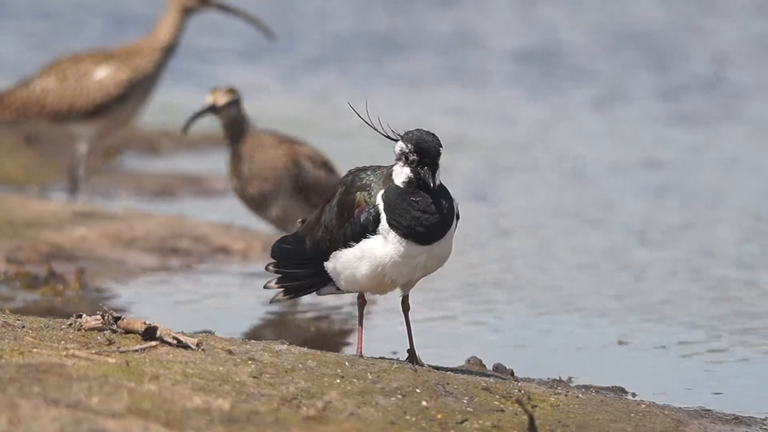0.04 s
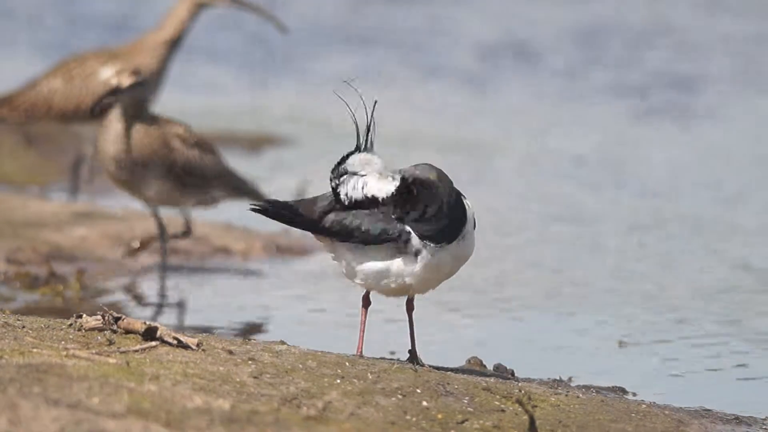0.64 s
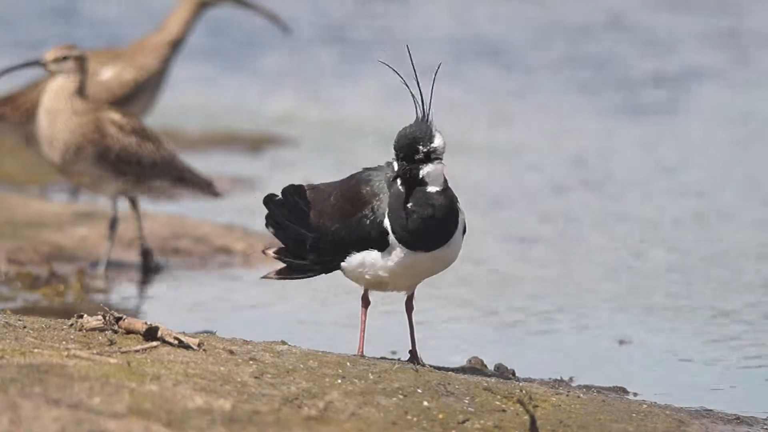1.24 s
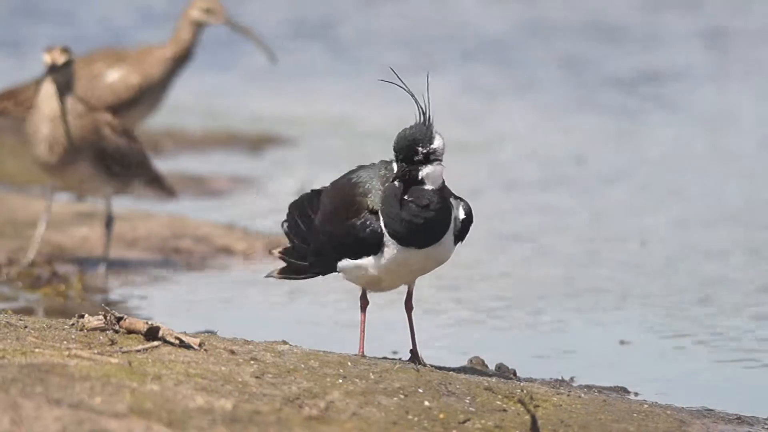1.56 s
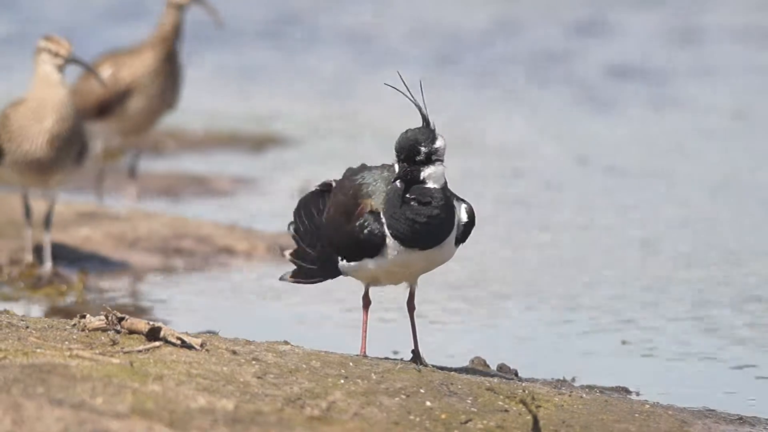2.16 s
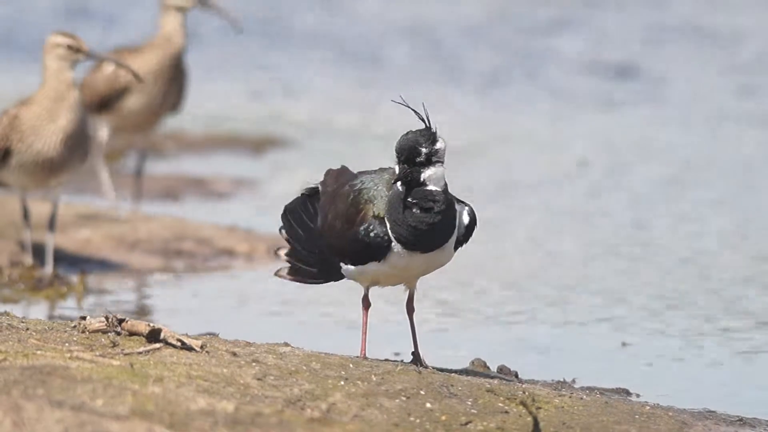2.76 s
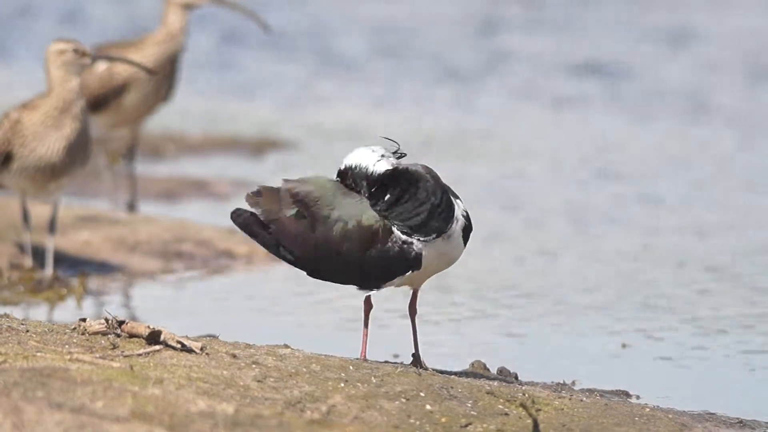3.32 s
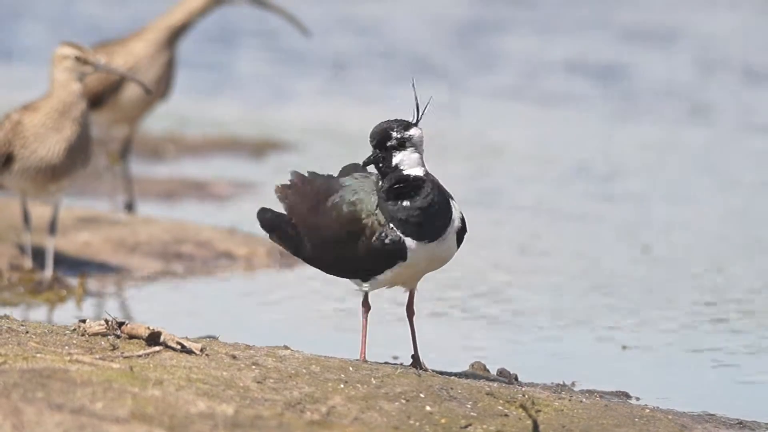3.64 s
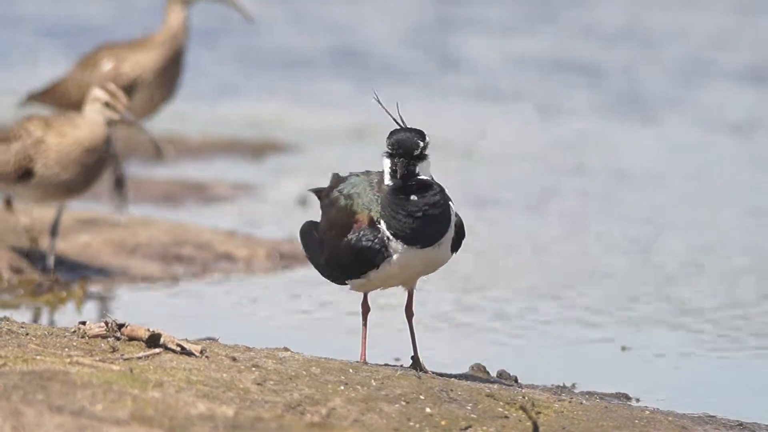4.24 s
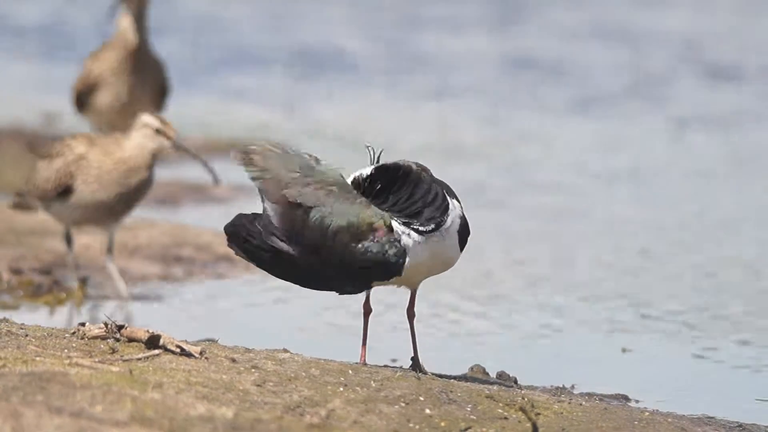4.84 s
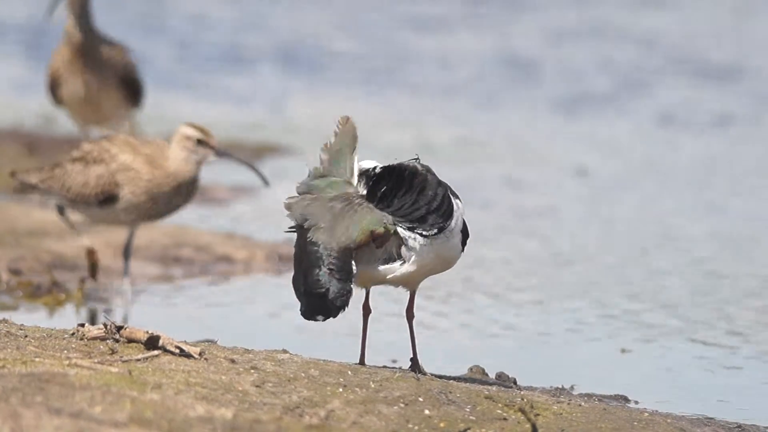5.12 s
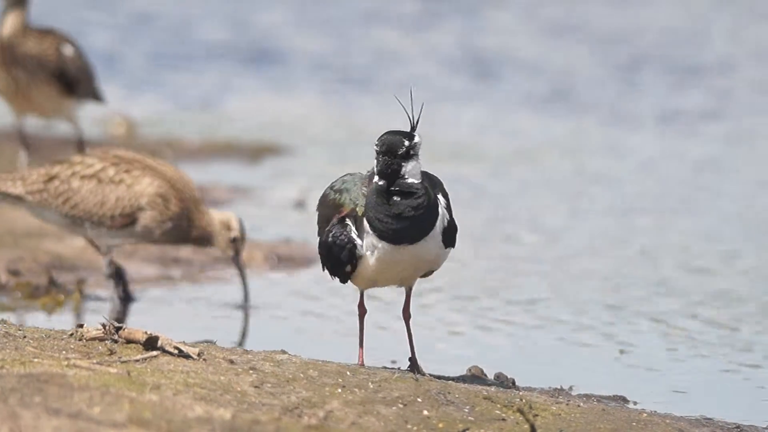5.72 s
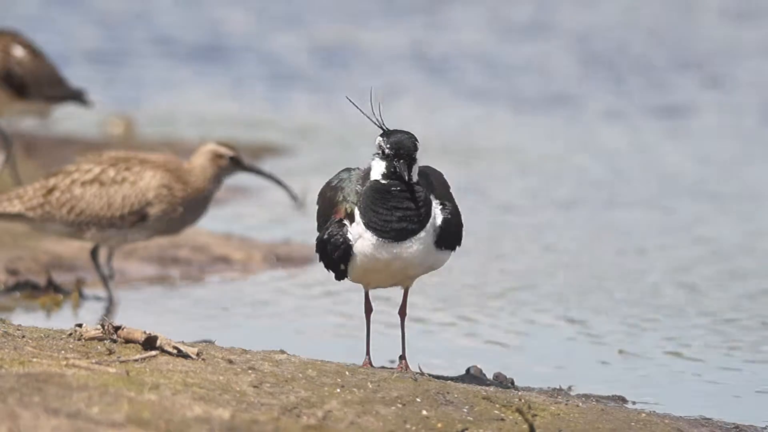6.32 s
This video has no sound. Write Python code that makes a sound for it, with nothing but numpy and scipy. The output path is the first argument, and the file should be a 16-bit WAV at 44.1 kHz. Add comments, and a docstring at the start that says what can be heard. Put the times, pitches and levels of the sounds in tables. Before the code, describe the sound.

Wading birds whistle, peep and trill over soft wind and ripples, with one brief wooden clatter near the end.

```python
"""Wading birds on a lagoon

Falling whistles, rising peeps, thin sweeps, short trills, a run of pips and distant yelps.
Each note is one nearly pure whistle on its kind's glide, thrown back by wooden walls and the far shore.
Something wooden clacks and rattles once, close by. Underneath lie the blur of a far flock, a faint
sinking tone, wind in reeds and ripples, one soft gust and a distant rumble."""
import sys
import numpy as np
from scipy import signal
from scipy.fft import rfft, irfft
from scipy.io import wavfile
from scipy.ndimage import uniform_filter1d

SR = 44100
rng = np.random.default_rng(int(sys.argv[2]) if len(sys.argv) > 2 else 0)


def inscribe(sig):
    """Save sig as 16-bit PCM at rate SR to the path in sys.argv[1].

    A 1-D sig is mono; a 2-D sig holds one channel per row.
    Samples are clipped to [-1, 1] before scaling.
    """
    pcm = np.round(np.clip(np.atleast_2d(sig).T, -1, 1) * 32767)
    wavfile.write(sys.argv[1], SR, pcm.astype(np.int16))


N = 281358

# Every _SHAPE holds the arguments of settling() or arching(), in Hz, seconds and dB.
TEW_SHAPE = dict(start_hz=2930, end_hz=2278, hold_s=.0115, settle_s=.02, length_s=.122, lead_s=.006, attack_s=.005, release_s=.026, fade_db=-6)
# Each row: start in seconds, final pitch in Hz, level in dB, pan (left minus right) in dB.
TEW_NOTES = [(.208, 2100, -41.2, -1), (.379, 2025, -40.6, -5), (.603, 2045, -40.8, -2),
             (.784, 2343, -37, -2), (.985, 2275, -37.5, 3), (1.168, 2025, -54, 0), (1.252, 2290, -37.4, 3),
             (1.388, 2025, -54, 0), (1.58, 2355, -49.5, -2), (1.768, 2343, -52, 0), (2.045, 2286, -56, 0),
             (3.572, 2410, -54, 0), (5.35, 2280, -59, 0)]
def tews(slowing=1.05):
    """Falling whistles; the lower ones are drawn out."""
    end_hz = TEW_SHAPE["end_hz"]
    notes = [(s, (end_hz / hz) ** slowing, hz / end_hz, db, pan_db) for s, hz, db, pan_db in TEW_NOTES]
    return sing("tew", settling(**TEW_SHAPE), notes)


PIP_SHAPE = dict(top_hz=2412, sag_hz=230, top_s=.036, length_s=.066, lead_s=.0175, attack_s=.006, release_s=.021, fade_db=-3)
# Each row: start in seconds, top pitch in Hz, level in dB.
PIP_NOTES = [(3.513, 2530, -46.5), (3.618, 2520, -46.3), (3.718, 2495, -46.8), (3.812, 2400, -46.5),
             (3.887, 2440, -47), (3.962, 2400, -43.5), (4.072, 2470, -43.3), (4.181, 2470, -42.2),
             (4.282, 2415, -41.3), (4.369, 2410, -43), (4.455, 2405, -42), (4.548, 2410, -39),
             (4.657, 2410, -39.2), (4.761, 2392, -37.2), (4.846, 2388, -37.2), (4.939, 2320, -44),
             (5.635, 2390, -37.5), (5.722, 2430, -41.8), (5.812, 2490, -43.2), (5.913, 2500, -41.5),
             (5.993, 2505, -40.6)]
def pips(pan_db=-1, pan_db_per_hz=.045):
    """Short arched notes of one length; higher ones come more from the left."""
    top_hz = PIP_SHAPE["top_hz"]
    notes = [(s, 1, hz / top_hz, db, pan_db + pan_db_per_hz * (hz - top_hz)) for s, hz, db in PIP_NOTES]
    return sing("pip", arching(**PIP_SHAPE), notes)


PEEP_SHAPE = dict(start_hz=3030, end_hz=3275, hold_s=.001, settle_s=.028, length_s=.08, lead_s=0, attack_s=.011, release_s=.02, fade_db=3.7)
# Each row: start in seconds, length factor, pitch factor, level in dB, pan in dB.
PEEP_NOTES = [(.085, 1, .98, -61, 0), (.312, .9, .958, -43.3, 2), (.745, 1.05, 1.0, -40.6, 4),
              (1.338, 1.12, 1.005, -38.8, 5), (1.786, .88, .993, -41.2, 3), (2.835, .6, 1.08, -63, 0),
              (3.07, .9, 1.08, -64, 0), (3.265, .7, 1.05, -63, 0)]
def peeps():
    """Short whistles that rise and level off."""
    return sing("peep", settling(**PEEP_SHAPE), PEEP_NOTES)


# Each row: time into the note in seconds, pitch in Hz, level in dB.
SLUR_CURVE = [(0, 2950, -12), (.012, 3050, -8), (.032, 3080, -12), (.045, 3165, -3), (.07, 3185, 1),
              (.085, 2900, -6), (.1, 2650, -10), (.125, 2480, -22)]
# Each row: start in seconds, length factor, pitch factor, level in dB, pan in dB.
SLUR_NOTES = [(2.196, 1, 1, -33, 4)]
def slur():
    """One loud whistle that climbs a little, then drops."""
    return sing("slur", SLUR_CURVE, SLUR_NOTES)


# Each row: time into the stroke in seconds, pitch in Hz, level in dB.
FLICK_CURVE = [(0, 3200, -20), (.012, 3550, -11), (.02, 3900, -30), (.027, 4450, -13), (.035, 4750, -12),
               (.039, 5750, -15), (.046, 6050, -11), (.06, 6350, -24)]
SWEEP_CURVE = [(0, 6400, -40), (.014, 6180, -7), (.028, 5980, 0), (.054, 5600, -2), (.07, 4900, -6),
               (.084, 4480, .5), (.104, 4230, -15)]
# Each row: start in seconds, level in dB.
SWEEP_CALLS = [(.305, -47), (1.307, -46.5), (2.183, -46.5), (3.288, -48), (3.884, -52), (5.113, -47.2),
               (5.745, -49.5)]
def sweeps(down_after_s=.093, pan_db=-5.5):
    """Thin calls: a quick flick up, then a longer sweep down."""
    ups = [(s, 1, 1, db, pan_db) for s, db in SWEEP_CALLS]
    downs = [(s + down_after_s, 1, 1, db, pan_db) for s, db in SWEEP_CALLS]
    return sing("flick", FLICK_CURVE, ups) + sing("sweep", SWEEP_CURVE, downs)


TRILL_SHAPE = dict(top_hz=3640, sag_hz=400, top_s=.018, length_s=.045, lead_s=0, attack_s=.006, release_s=.007, fade_db=0)
# Each row: start in seconds, syllable count, level in dB.
TRILL_CALLS = [(-.2, 4, -49.5), (.733, 4, -47.8), (1.841, 4, -45.7), (2.172, 1, -47), (3.442, 4, -46.3)]
# Each row: time into the trill in seconds, pitch factor, accent in dB.
TRILL_RHYTHM = [(0, 1.06, -2.5), (.063, 1.005, -.3), (.121, 1.0, 1), (.193, .99, -.3)]
def trills(pan_db=-2.2):
    """Raspy syllables on one rhythm; the first trill is already ending as the scene opens."""
    notes = [(s + after_s, 1, pitch, db + accent_db, pan_db)
             for s, count, db in TRILL_CALLS
             for after_s, pitch, accent_db in TRILL_RHYTHM[:count]
             if s + after_s > -TRILL_SHAPE["length_s"]]
    return sing("trill", arching(**TRILL_SHAPE), notes)


# Each row: time into the note in seconds, pitch in Hz, level in dB.
HOOK_CURVE = [(0, 4250, -16), (.015, 4780, -6.5), (.032, 4900, -5.5), (.045, 4500, -14), (.053, 3450, -3),
              (.062, 3130, -1), (.08, 3050, -5), (.095, 3020, -14)]
DIP_CURVE = [(0, 5450, -8), (.012, 5200, -2), (.033, 4500, 0), (.055, 4600, -8), (.08, 5000, -5),
             (.115, 4950, -16)]
BUZZ_CURVE = [(0, 7000, -20), (.04, 6450, -9), (.065, 5850, 0), (.095, 5250, -5), (.125, 4500, -1),
              (.145, 3900, -8), (.17, 3820, -14)]
# Each row: start in seconds, length factor, pitch factor, level in dB, pan in dB.
HOOK_NOTES = [(4.298, .9, 1, -51.5, -2), (4.48, .8, .95, -52, -2), (4.96, 1.1, .99, -49, -2),
              (5.765, 1.1, 1.04, -49, -2)]
DIP_NOTES = [(2.878, 1, 1, -52, -3)]
BUZZ_NOTES = [(4.395, 1, 1, -49, -6)]
def squeaks():
    """High, raspy calls: hooks that rise and plunge, one dip and one falling buzz."""
    return (sing("hook", HOOK_CURVE, HOOK_NOTES) + sing("dip", DIP_CURVE, DIP_NOTES)
            + sing("buzz", BUZZ_CURVE, BUZZ_NOTES))


# Each row: time into the note in seconds, pitch in Hz, level in dB.
HELD_CURVE = [(0, 2780, -10), (.025, 2580, 3), (.06, 2440, -4), (.085, 2415, -8), (.11, 2410, -4),
              (.26, 2410, -6)]
# Each row: start in seconds, length factor, pitch factor, level in dB, pan in dB.
HELD_NOTES = [(6.13, 1, 1, -51.5, 7)]
def held_note():
    """A closing whistle that falls, then holds its pitch."""
    return sing("held", HELD_CURVE, HELD_NOTES)


RISE_SHAPE = dict(start_hz=4620, end_hz=5680, hold_s=.006, settle_s=.088, length_s=.102, lead_s=.002, attack_s=.007, release_s=.022, fade_db=6)
# Each row: start in seconds, note count, period in seconds, first pitch factor, peak level in dB.
RISING_RUNS = [(.6, 9, .137, 1.135, -57.3), (5.262, 5, .153, 1.06, -58.5)]
def rises(last_pitch=.975, sink_notes=1.8, loudest_share=.42, tiring=15, pan_db=-3):
    """Even runs of rising notes; each run starts high, sinks in pitch, swells and tires."""
    notes = []
    for start_s, count, period_s, first_pitch, peak_db in RISING_RUNS:
        for k in range(count):
            pitch = last_pitch + (first_pitch - last_pitch) * np.exp(-k / sink_notes)
            db = peak_db - tiring * (k / (count - 1) - loudest_share) ** 2
            notes.append((start_s + k * period_s, 1, pitch, db, pan_db))
    return sing("rise", settling(**RISE_SHAPE), notes)


YELP_SHAPE = dict(top_hz=1890, sag_hz=250, top_s=.062, length_s=.135, lead_s=0, attack_s=.025, release_s=.035, fade_db=-1)
# Each row: start in seconds, length factor, pitch factor, level in dB, pan in dB.
CLEAR_YELPS = [(1.32, 1.1, .94, -55, 0), (2.59, .5, 1.22, -56, 0), (2.66, .6, 1.19, -52.5, 0),
               (2.78, .4, .97, -54, 0), (3.09, .5, 1.2, -55.5, 0), (3.145, .6, 1.16, -55, 0),
               (3.19, .7, .98, -54.5, 0), (3.245, .9, 1.14, -54.5, 0), (3.96, 1, 1.01, -53, 0),
               (4.08, .45, .95, -55, 0)]
# Each row: start and end in seconds, pitch in Hz, level in dB.
FAINT_BOUTS = [(2.2, 2.42, 1830, -58), (2.63, 2.86, 1770, -58), (3.44, 3.56, 1800, -59),
               (3.75, 4.15, 1750, -62), (4.67, 5.3, 1780, -60.3), (5.08, 5.25, 2200, -58)]
def yelps(per_s=10, scatter_octaves=.11, scatter_db=1.5):
    """Distant birds yelp in loose bouts around a few clearer calls."""
    def notes():
        yield from CLEAR_YELPS
        for start_s, end_s, hz, db in FAINT_BOUTS:
            for s in np.arange(start_s, end_s, 1 / per_s):
                late, long, high, loud = rng.uniform(-1, 1, 4)
                stretch = .7 * 2 ** (.5 * long)
                pitch = hz / YELP_SHAPE["top_hz"] * 2 ** (scatter_octaves * high)
                yield s + .5 * late / per_s, stretch, pitch, db + scatter_db * loud, 0
    return sing("yelp", arching(**YELP_SHAPE), notes())


PIPE_SHAPE = dict(start_hz=1435, end_hz=1372, hold_s=.01, settle_s=.35, length_s=.62, lead_s=0, attack_s=.04, release_s=.14, fade_db=-1)
# Each row: start in seconds, length factor, pitch factor, level in dB, pan in dB.
PIPE_NOTES = [(0, .5, 1.01, -68, 0), (.97, .9, 1.06, -62, 0), (2.78, 1, 1, -64, 0),
              (3.82, .4, .955, -66, 0), (5.96, .7, .99, -67, 0)]
def pipes():
    """Faint, long, low whistles that sag slightly."""
    return sing("pipe", settling(**PIPE_SHAPE), PIPE_NOTES)


def envelope(length_s, lead_s, attack_s, release_s, fade_db, edge_db=-16):
    """Times and dB levels of a note: soft lead-in, attack, sloping hold, release."""
    t = np.linspace(0, length_s, 80)
    onset = np.clip(1 - (t - lead_s) / attack_s, 0, 1)
    ending = np.maximum(1 - (length_s - t) / release_s, 0)
    return t, edge_db * (onset + ending) + fade_db * t / length_s


def settling(start_hz, end_hz, hold_s, settle_s, **shape):
    """A glide that holds its first pitch, then slides ever more slowly towards its last."""
    t, db = envelope(**shape)
    hz = end_hz + (start_hz - end_hz) * np.exp(-np.maximum(t - hold_s, 0) / settle_s)
    return np.transpose([t, hz, db])


def arching(top_hz, sag_hz, top_s, **shape):
    """A glide that starts sag_hz low, peaks at top_s and falls again."""
    t, db = envelope(**shape)
    return np.transpose([t, top_hz - sag_hz * (t / top_s - 1) ** 2, db])


def whistle(glide, stretch, pitch, level_db, pan_db, rough, rasp, octave_db,
            flutter_db=1.3, lag_s_per_db=8e-6, break_hz_per_s=60000):
    """One unsteady, slightly raspy tone with a weak octave, louder and earlier on the bird's side."""
    s, hz, db = np.transpose(glide)
    t = np.arange(0, s[-1] * stretch, 1 / SR)
    hz = uniform_filter1d(np.interp(t / stretch, s, hz), size=200, mode="nearest") * pitch
    rasp = rasp * (1 + abs(np.gradient(hz, t)) / break_hz_per_s)  # the voice breaks up on pitch leaps
    noise = (wander(len(t), rate_hz=330) + 1j * wander(len(t), rate_hz=330)) / np.sqrt(2)
    grit = (1 + rasp * noise) / np.hypot(1, rasp)
    hz = hz * (1 + rough * wander(len(t), rate_hz=260))
    level = gain_of(level_db + np.interp(t / stretch, s, db) + flutter_db * wander(len(t), rate_hz=120))
    fade = np.clip(np.minimum(t, t[-1] - t) / .003, 0, 1)
    side_db = np.array([[.5], [-.5]]) * pan_db
    phasor = np.exp(2j * np.pi * (np.cumsum(hz) / SR + hz * side_db * lag_s_per_db))
    tone = (grit * (phasor + gain_of(octave_db) * phasor ** 2)).real
    return np.sqrt(2) * level * fade * gain_of(side_db) * tone


# Each row, by voice: pitch roughness and rasp as shares, then octave, wall echo and shore echo in dB.
TIMBRES = dict(tew=(.006, .2, -42, -1, -13), peep=(.003, .07, -32, -11, -16),
           slur=(.002, .04, -29, -8, -15), flick=(.025, .4, -50, -2, -22), sweep=(.006, .16, -50, -5, -22),
           rise=(.009, .16, -50, -3, -18), trill=(.022, .5, -36, -1, -19), pip=(.007, .2, -33, -8, -11.5),
           hook=(.014, .5, -30, 0, -15), dip=(.008, .25, -50, -2, -17), buzz=(.025, .45, -50, -1, -18),
           yelp=(.014, .25, -19, -2, -6), pipe=(.003, .12, -30, -8, -10), held=(.005, .2, -35, -8, -12))
def sing(name, glide, notes):
    """One voice's whistles, split three ways: direct, towards the walls, towards the shore."""
    rough, rasp, octave_db, wall_db, shore_db = TIMBRES[name]
    voice = np.zeros((2, N))
    for s, stretch, pitch, level_db, pan_db in notes:
        add(voice, s, whistle(glide, stretch, pitch, level_db, pan_db, rough, rasp, octave_db))
    voice /= np.hypot(1, gain_of(wall_db))  # direct and wall paths share the energy
    return np.array([voice, gain_of(wall_db) * voice, gain_of(shore_db) * voice])


def birds(gain_db=.7):
    """All the voices, with quick echoes from the walls and a faint tail from the shore."""
    direct, walls, shore = (tews() + peeps() + slur() + sweeps() + rises() + trills() + pips()
                            + squeaks() + pipes() + held_note() + yelps())
    return gain_of(gain_db) * (direct + slaps(walls) + echo(shore, delay_s=.04, t60_s=1.0))


# Each row: delay in seconds, level in dB.
WALL_SLAPS = [(.007, -6), (.013, -4), (.021, -6), (.033, -10)]
def slaps(x, spread_s=.001, scatter_db=-5):
    """Strong reflections off flat boards beat against each glide; weaker scatter follows."""
    out = gain_of(scatter_db) * echo(x, delay_s=.008, t60_s=.17)
    for delay_s, db in WALL_SLAPS:
        for ear in range(2):
            lag = int((delay_s + spread_s * rng.uniform(-1, 1)) * SR)
            out[ear, lag:] += gain_of(db) * x[ear, :N - lag]
    return out


# Each row: start in seconds, level in dB, tilt above 1500 Hz in dB per octave.
CLACK_BLOWS = [(5.43, -33.3, 0), (5.451, -43, 2), (5.459, -42, 0), (5.485, -42, -4), (5.525, -39.7, -4),
               (5.586, -40.7, -4)]
# Each row: frequency in Hz, relative level in dB.
WOOD_SPECTRUM = [(100, -25), (300, -14), (530, 0), (700, -14), (950, -9), (1150, 1.5), (1750, 1.5),
                 (2250, -3), (2700, -11), (4500, -14), (6500, -13), (8000, -27), (11000, -35)]
def clack(t60_s=.1, rise_s=.0025, room_db=-7):
    """A wooden piece strikes and rattles; its dense modes die quickly, and the last blows are duller."""
    t, hz = np.arange(8192) / SR, np.fft.rfftfreq(8192, 1 / SR)
    out = np.zeros((2, N))
    for s, level_db, tilt in CLACK_BLOWS:
        mid, side = rfft(rng.standard_normal((2, len(t))))
        colour = gain_of(read(WOOD_SPECTRUM, hz) + tilt * np.log2(np.maximum(hz / 1500, 1)))
        ring = unit_rms(irfft(np.array([mid + .5 * side, mid - .5 * side]) * colour))
        add(out, s, ring * gain_of(level_db - 60 * t / t60_s) * np.minimum(t / rise_s, 1))
    return out + gain_of(room_db) * echo(out, delay_s=.004, t60_s=.2)


# Each row: frequency in Hz, relative density in dB.
FLOCK_SPECTRUM = [(300, -30), (500, -8), (720, -1), (1000, -3), (1500, 0), (2200, -1), (3100, -2),
                  (3800, -14), (6000, -30)]
# Each row: time in seconds, level in dB.
FLOCK_LEVELS = [(0, -61), (.8, -58), (1.4, -56.5), (2.3, -59), (2.8, -65), (3.6, -64), (4.2, -65.5),
                (5.2, -66), (6.38, -68)]
def far_flock():
    """Far calls blurred into patchy noise."""
    return swell(FLOCK_LEVELS) * diffuse_noise(FLOCK_SPECTRUM, patchy_db=2.5)


# Each row: frequency in Hz, relative density in dB.
AIR_SPECTRUM = [(150, -35), (300, -7), (560, 0), (850, -3), (1400, -3), (1940, -5), (2400, -6), (3200, -10),
                (4500, -12), (8600, -14), (11000, -16.5), (13000, -40)]
GUST_SPECTRUM = [(110, -30), (180, -4), (240, 0), (420, -2), (600, -8), (1000, -25)]
# Each row: time in seconds, level in dB.
GUST_LEVELS = [(0, -88), (2.2, -82), (2.55, -68.5), (2.8, -70), (3.2, -64.5), (3.55, -80), (6.38, -88)]
def wind(steady_db=-56.6):
    """Steady wind in reeds and ripples, and one soft passing gust."""
    steady = gain_of(steady_db) * diffuse_noise(AIR_SPECTRUM, patchy_db=1.0)
    return steady + swell(GUST_LEVELS) * diffuse_noise(GUST_SPECTRUM, patchy_db=2.0)


# Each row: time in seconds, pitch in Hz, level in dB.
DRONE_CURVE = [(0, 760, -85), (.9, 745, -75), (1.2, 735, -70.5), (2, 718, -68.5), (2.7, 705, -72),
               (3.2, 695, -80), (6.38, 690, -85)]
def drone():
    """A faint, slowly sinking tone, blurred by distance."""
    s, hz, db = np.transpose(DRONE_CURVE)
    t = np.arange(N) / SR
    phase = 2 * np.pi * np.cumsum(np.interp(t, s, hz)) / SR
    tone = np.sqrt(2) * gain_of(np.interp(t, s, db)) * np.sin(phase)
    return echo(tone[None], delay_s=.004, t60_s=.5)


# Each row: frequency in Hz, relative density in dB.
RUMBLE_SPECTRUM = [(20, -37), (45, -23), (72, -29), (87, 1), (108, -1), (132, -12), (168, 0), (205, -5),
                   (245, -1), (340, -3), (500, -11), (900, -35)]
# Each row: time in seconds, level in dB.
RUMBLE_LEVELS = [(0, -70), (2.4, -70), (3.6, -70.3), (4.8, -69), (6.38, -69.3)]
def rumble():
    """Low, nearly steady noise from far off."""
    return swell(RUMBLE_LEVELS) * diffuse_noise(RUMBLE_SPECTRUM, patchy_db=1.5)


# Each row: frequency in Hz, left-right coherence.
EAR_COHERENCE = [(60, .94), (110, .89), (190, .4), (340, .02), (610, -.35), (1080, -.2), (1930, .1),
                 (3440, -.05), (11000, -.05)]
def diffuse_noise(spectrum, patchy_db):
    """Noise of rms 1 with drifting patches, alike in both ears only in the bass."""
    frames, hz = N // 512 + 5, np.fft.rfftfreq(2048, 1 / SR)
    a, b, c, d, patches = rng.standard_normal((frames, len(hz), 5)).T
    patches = unit_rms(uniform_filter1d(uniform_filter1d(patches, size=20, axis=0), size=12, axis=1))
    coherence = read(EAR_COHERENCE, hz)[:, None]
    left = a + 1j * b
    right = coherence * left + np.sqrt(1 - coherence ** 2) * (c + 1j * d)
    bins = np.array([left, right]) * gain_of(read(spectrum, hz)[:, None] + patchy_db * patches)
    return unit_rms(signal.istft(bins, nperseg=2048, noverlap=1536)[1][:, :N])


def echo(x, delay_s, t60_s):
    """Scattered reflections, different for each ear, that start after a delay and die away."""
    t = np.arange(SR) / SR
    taps = rng.standard_normal((2, SR)) * (rng.random((2, SR)) < .08)
    taps *= (t > delay_s) * gain_of(-60 * t / t60_s)
    return signal.fftconvolve(x, taps / np.linalg.norm(taps, axis=1, keepdims=True), axes=1)[:, :N]


def wander(count, rate_hz):
    """Smooth random motion of rms about 1, rolling off above rate_hz."""
    hz = np.fft.rfftfreq(SR, 1 / SR)
    return unit_rms(irfft(rfft(rng.standard_normal(SR)) / (1 + (hz / rate_hz) ** 4)))[:count]


def gain_of(db):
    """Decibels to amplitude."""
    return 10 ** (np.asarray(db) / 20)


def unit_rms(x):
    """Scales to rms 1."""
    return x / np.sqrt(np.mean(x ** 2) + 1e-20)


def read(points, hz):
    """Interpolates on a log-frequency axis."""
    f, value = np.transpose(points)
    return np.interp(np.log(hz + 1), np.log(f + 1), value)


def swell(curve):
    """A level curve as a gain for every sample."""
    return gain_of(np.interp(np.arange(N) / SR, *np.transpose(curve)))


def add(mix, s, sound):
    """Mixes a stereo sound in at time s, or at 0 if s is negative."""
    part = mix[:, max(0, round(s * SR)):][:, :sound.shape[1]]
    part += sound[:, :part.shape[1]]


def scene():
    """Birds and the clack over wind, the far flock, a faint tone and a low rumble."""
    background = wind() + far_flock() + drone()
    return birds() + clack() + background + rumble()


def record(dry, edge_hz=11100):
    """A steep low-pass cuts the top treble."""
    lowpass = signal.firwin(1023, edge_hz, window=("kaiser", 9), fs=SR)
    return signal.oaconvolve(dry, lowpass[None], "same")


dry = scene()
out = record(dry)
inscribe(out)
```